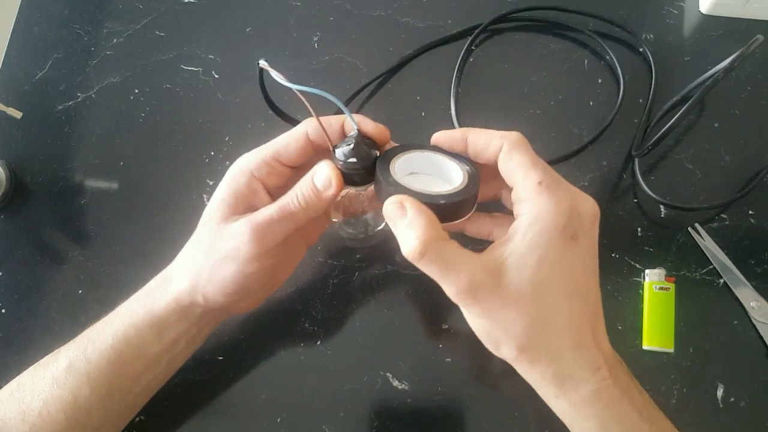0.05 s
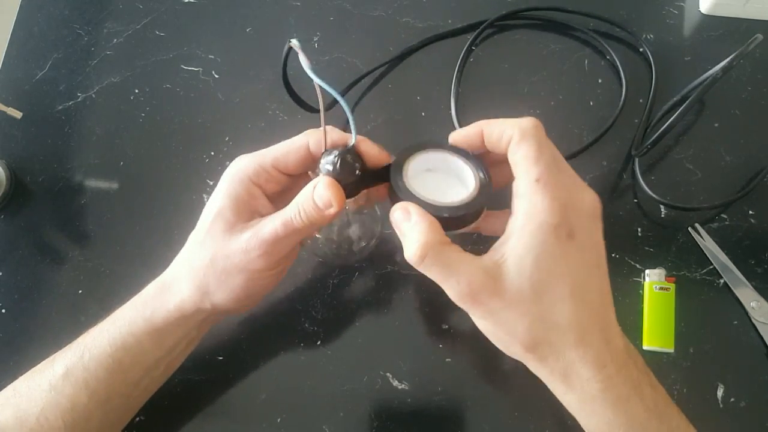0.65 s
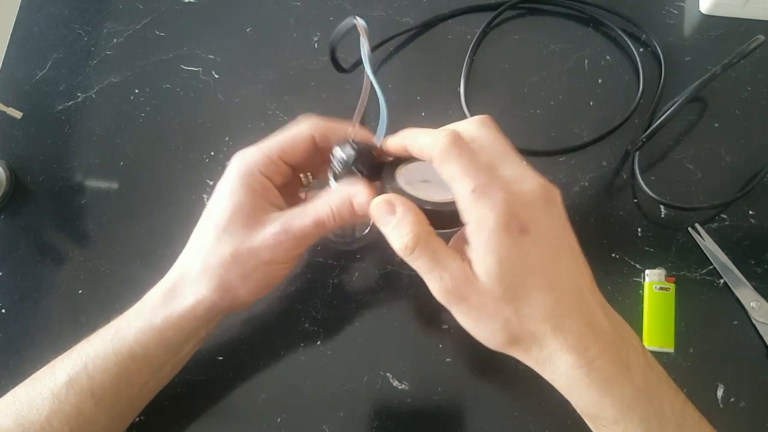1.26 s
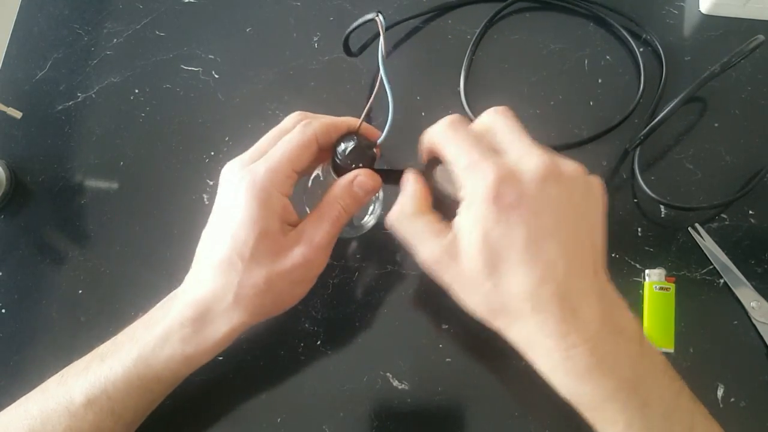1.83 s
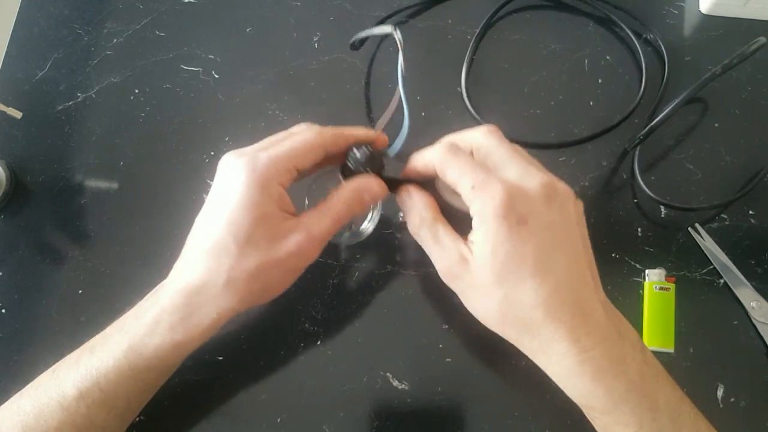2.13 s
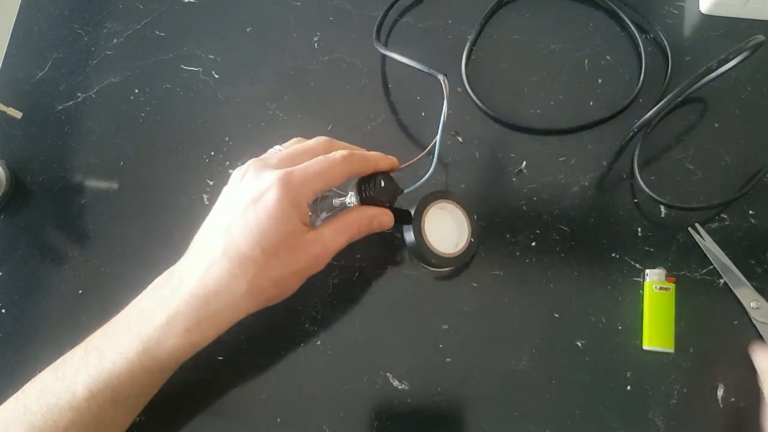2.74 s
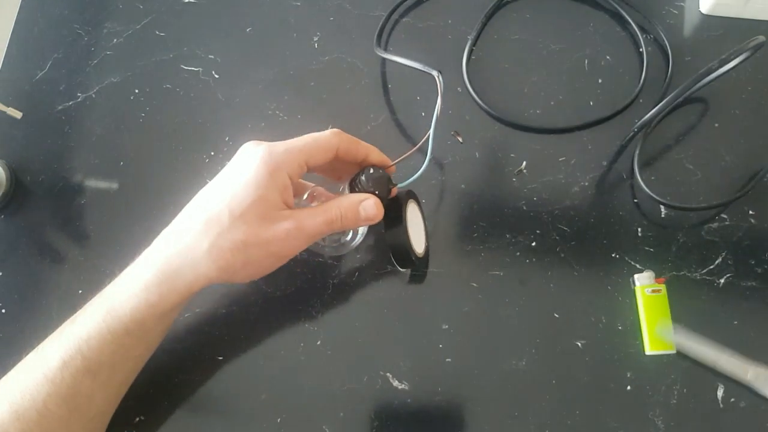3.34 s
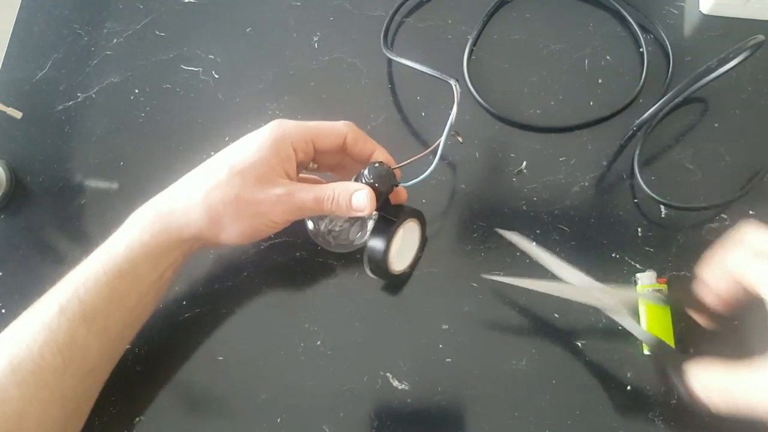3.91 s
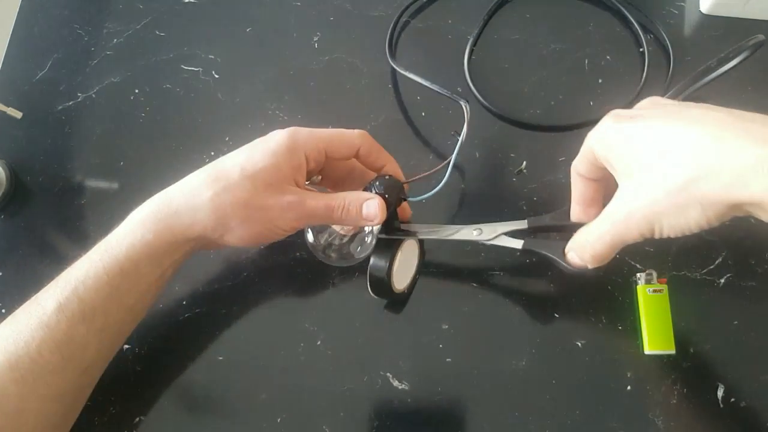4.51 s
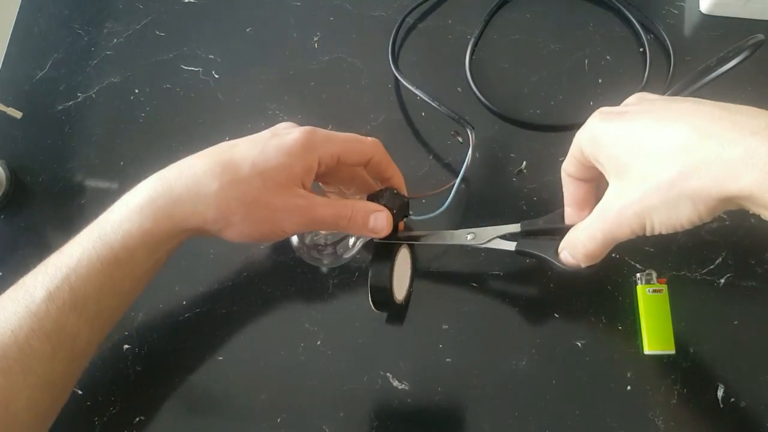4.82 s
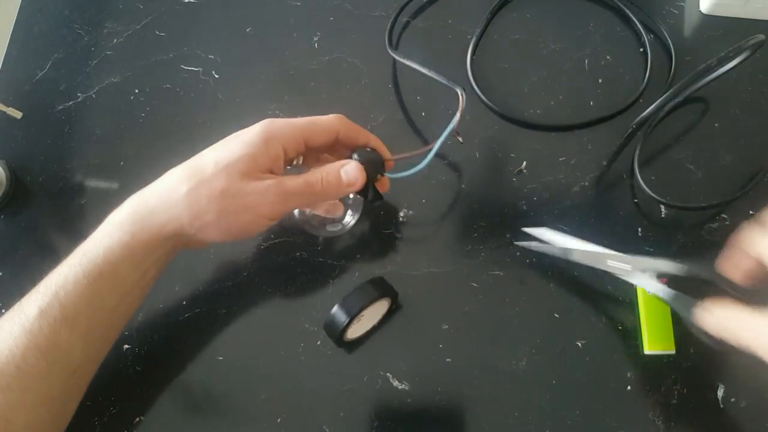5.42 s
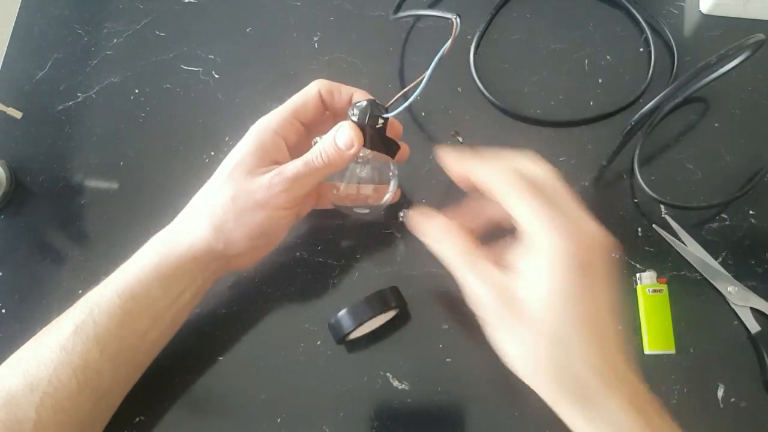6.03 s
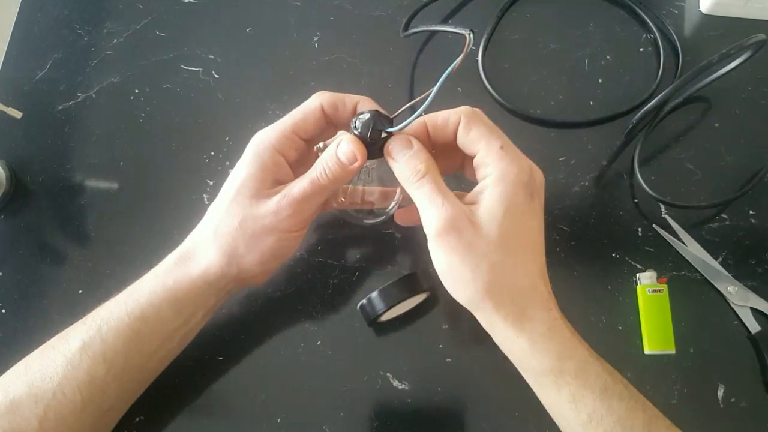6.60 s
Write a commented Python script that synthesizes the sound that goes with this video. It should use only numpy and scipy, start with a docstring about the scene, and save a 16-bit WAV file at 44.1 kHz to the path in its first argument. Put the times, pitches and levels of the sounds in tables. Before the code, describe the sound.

Close by in a bare, ringing room, tape unsticks with quiet snaps and a short crackle before its roll is set down with a dull knock. Steel scissors tap, drag and groan softly over a tabletop, then click shut in a snip. The roll falls with a second knock, the tape snaps again, and the scissors clatter down, the loudest sound. A faint mains hum lies underneath.

```python
"""Taping a lamp holder

Insulating tape is wound round a lamp holder over a table in a bare, ringing room. The glue
lets go in snaps and the roll knocks on the table. Scissors are picked up and snip the tape,
the roll drops, and the scissors clatter down. A mains hum lies under it all.
Each hit is a click with a fading ring; each rub is a swell of filtered noise."""
import sys
import numpy as np
from scipy import signal
from scipy.fft import rfft, irfft
from scipy.io import wavfile

SR = 44100
rng = np.random.default_rng(int(sys.argv[2]) if len(sys.argv) > 2 else 0)


def file_out(sig):
    """Save sig as 16-bit WAV at sys.argv[1]."""
    # one column per channel
    cols = np.atleast_2d(sig).T
    # limit, then scale
    lim = np.clip(cols, -1, 1)
    pcm = np.round(lim * 32767).astype(np.int16)
    wavfile.write(sys.argv[1], SR, pcm)


N = 293706
TIME = np.arange(N) / SR
HIT_SAMPLES = 24576

# glue letting go; more tilt sounds brighter: t/s, level/dB, tilt/dB per octave
SNAP_HITS = [(.4235, -43, 0.5), (.4705, -52, 1.5), (.7623, -55.5, 0), (1.0207, -64, 3), (1.347, -60.5, 5),
             (1.3684, -47.5, 3), (1.377, -47, -1), (1.3915, -40, 2.5), (4.7537, -49.5, -.5),
             (4.9975, -55.5, 0), (5.002, -55, 0), (5.1785, -42.5, 6), (5.1905, -44.5, 7.5),
             (5.2225, -52, 4), (6.376, -56, 3)]
# stretches of peeling: t/s, length/s, crackle level/dB
PEEL_SPANS = [(0.403, .013, -55), (1.357, .05, -57)]
# the tape's tone colour: f/Hz, level/dB
TAPE_COLOUR = [(100, -2.5), (400, 2), (850, -3.5), (1200, 0), (2300, -3.5), (3200, -2), (3900, -2.5),
               (5300, -4.5), (7800, 0.5), (10000, -10.5), (13000, -5), (16000, -15.5)]
# its ringing notes; decay is the time to fade by 60 dB: f/Hz, level/dB, decay/s
TAPE_NOTES = [(1210, 5, 0.044), (3720, -8, 0.06), (4150, 2, 0.035), (7300, -27, 0.045), (8250, 6, 0.035)]

def tape():
    """Glue lets go in single snaps, or in a fine crackle of tiny ones at uneven moments."""
    snaps = hits(SNAP_HITS, TAPE_COLOUR, TAPE_NOTES, room_db=-1.5, ring_db=-10.5,
                 chatter_s=.0017, chatter_db=1.5, left_db=1, lead_s=.00004)
    tiny_snaps = []
    for start, length, db in PEEL_SPANS:
        count = max(int(length * 170), 1)  # about 170 a second
        for k, (late, force) in enumerate(rng.standard_normal((count, 2))):
            tiny_snaps.append((start + length * (k + .5 + .19 * late) / count, db + 3 * force, 0))
    return snaps + hits(tiny_snaps, TAPE_COLOUR, TAPE_NOTES, room_db=-11, ring_db=-14,
                        chatter_s=.0043, chatter_db=5, left_db=2)


# plastic ticks: t/s, level/dB, tilt/dB per octave
PLASTIC_HITS = [(.0898, -53.5, -3), (.5408, -51, 1), (5.0415, -54, 6.5)]
# the plastic's tone colour: f/Hz, level/dB
PLASTIC_COLOUR = [(100, -39.5), (700, -6.5), (1400, -2), (1800, -1.5), (2500, 6), (3200, -3.5), (4500, -11),
                  (6100, 0), (7500, -15), (16000, -37)]
# its ringing notes: f/Hz, level/dB, decay/s
PLASTIC_NOTES = [(1093, 12, 0.051), (1400, 12, 0.082), (1980, -17, 0.07), (2690, 8.5, 0.04),
                 (6060, -1, 0.016)]

def plastic_ticks():
    """The hard plastic of the lamp holder and the roll's rim ticks when bumped."""
    return hits(PLASTIC_HITS, PLASTIC_COLOUR, PLASTIC_NOTES, room_db=4, ring_db=-1.5,
                chatter_s=.0052, chatter_db=24, left_db=2)


# the roll landing: t/s, level/dB, tilt/dB per octave, pitch ratio
ROLL_LANDINGS = [(2.389, -26.5, 2, 1.12), (5.0413, -29.5, -1, 0.96)]
# the roll rocking: t/s, level/dB
ROLL_ROCKS = [(5.186, -42), (5.267, -57.5), (5.398, -57.5), (5.590, -56)]
# its tone colour at pitch ratio 1: f/Hz, level/dB
ROLL_COLOUR = [(50, -20), (90, -7.5), (135, -10.5), (200, -6), (290, 4), (420, 2.5), (560, -4.5),
               (760, -11), (1000, -14), (1700, -16), (2500, -27), (4500, -40), (7000, -39.5),
               (10000, -59.5), (16000, -65)]
# its ringing notes at pitch ratio 1: f/Hz, level/dB, decay/s
ROLL_NOTES = [(231.8, -0.5, .7), (284.5, -2.5, 0.4), (324.6, -4, 0.29)]

def roll_knocks():
    """The roll lands on one edge, flops onto the other and rocks to rest; softer knocks are duller."""
    def knock(events, pitch):
        colour = [(hz * pitch, db) for hz, db in ROLL_COLOUR]
        notes = [(hz * pitch, db, decay) for hz, db, decay in ROLL_NOTES]
        return hits(events, colour, notes, room_db=3.5, ring_db=-8,
                    chatter_s=.012, chatter_db=7, left_db=1.5, table_db=-11)
    flop_s, flop_db, firm_db = .022, -7, -32.5
    dulling = .57  # tilt lost for each dB softer
    out = knock([(start, db, dulling * (db - firm_db)) for start, db in ROLL_ROCKS], pitch=.99)
    for start, db, tilt, pitch in ROLL_LANDINGS:
        flop = (start + flop_s, db + flop_db, tilt + dulling * flop_db)
        out += knock([(start, db, tilt), flop], pitch)
    return out


# scissors hitting the table: t/s, level/dB, tilt/dB per octave
SCISSOR_HITS = [(2.9917, -38, -2.5), (3.040, -48.5, 0.5), (3.3838, -42.5, -1), (3.4267, -32.5, 3),
                (5.7849, -27.5, 2), (5.8188, -13, 1), (5.8295, -27.5, -3.5), (5.857, -24.5, -3)]
# their tone colour: f/Hz, level/dB
SCISSOR_COLOUR = [(50, -26.5), (105, -6), (170, -7), (260, -5), (400, 4.5), (700, -5.5), (1080, 0),
                  (1500, -9), (2100, 1.5), (3200, 2.5), (4500, -13), (5900, 3.5), (7100, -5), (8600, -4),
                  (10200, -17.5), (13000, -10), (16000, -18.5)]
# tips touching down while the handles are held: t/s, level/dB, tilt/dB per octave
TIP_HITS = [(3.4462, -37.5, 1), (3.830, -61.5, 4), (5.6656, -34, -0.5), (5.6956, -35.5, -3),
            (5.716, -51, 5.5)]
# their tone colour: f/Hz, level/dB
TIP_COLOUR = [(50, -22), (105, -3), (200, 1), (310, -7.5), (410, 12), (650, -1), (850, -15.5),
              (1300, -12.5), (2300, -1.5), (4100, -7.5), (5900, 5.5), (7000, -9.5), (8500, 7), (10200, -12),
              (12500, -0.5), (16000, -10)]
# the steel's ringing notes: f/Hz, level/dB, decay/s
STEEL_NOTES = [(1740, -2.5, 0.56), (2220, 5.5, 0.26), (2225, -8, 1), (2376, 5.5, 1), (2460, -5.5, 0.15),
               (2480, -3.5, 0.48), (2960, -6.5, .55), (2990, 0.5, 0.61), (3290, -1.5, 0.27),
               (3260, -11, .5), (3680, -0.5, 0.41), (4660, 3.5, .35), (5500, -9, 0.13), (5770, 6, 0.15),
               (7640, -4, .35), (9400, -6.5, 0.4), (12300, -3, .2)]

def scissor_clatter():
    """The scissors meet the table, and both the steel and the table top ring."""
    clatter = hits(SCISSOR_HITS, SCISSOR_COLOUR, STEEL_NOTES, room_db=6, ring_db=-6,
                   chatter_s=.0027, chatter_db=4.5, left_db=2, lead_s=.0004, table_db=-9.5)
    tips = hits(TIP_HITS, TIP_COLOUR, STEEL_NOTES, room_db=3, ring_db=-10.5,
                chatter_s=.0026, chatter_db=18.5, left_db=.5, table_db=-5.5)
    return clatter + tips


# blade clicks: t/s, level/dB, tilt/dB per octave
BLADE_HITS = [(4.4514, -34.5, -2.5), (4.5332, -49, 18), (4.6644, -48.5, 7)]
# the blades' tone colour: f/Hz, level/dB
BLADE_COLOUR = [(200, -30), (700, -24.5), (1500, -10), (1900, -11.5), (2250, -4), (3000, -17.5),
                (3700, -19), (5000, -6), (5600, -12), (6450, 8.5), (7200, -11), (8000, -8), (10000, -29),
                (16000, -39)]
# their ringing notes: f/Hz, level/dB, decay/s
BLADE_NOTES = [(2300, 23, 0.011), (4850, 2, 0.06), (6600, -15, 0.015), (7400, 4, .02)]

def scissor_snips():
    """The blades click against each other and ring very briefly."""
    return hits(BLADE_HITS, BLADE_COLOUR, BLADE_NOTES, room_db=-1.5, ring_db=-2,
                chatter_s=.00095, chatter_db=10, left_db=2, lead_s=.00014)


# a hand leaning on the table: t/s, length/s, relative level/dB
LEAN_SPANS = [(2.855, 0.035, -51.5), (3.19, 0.019, -58.5), (3.415, 0.077, -47), (3.66, 0.026, -58)]
# its deep rumble: f/Hz, level/dB
RUMBLE_COLOUR = [(25, -39), (45, -7), (70, -1), (110, 2), (150, -6), (300, -19), (1000, -58)]
# scissors being pushed: t/s, length/s, relative level/dB
PUSH_SPANS = [(2.855, 0.079, -58), (2.99, 0.108, -43.5), (3.17, 0.086, -52), (3.422, 0.033, -36),
              (3.695, 0.032, -47), (3.885, 0.016, -54)]
# their scrape: f/Hz, level/dB
SCRAPE_COLOUR = [(200, 6), (450, 16.5), (1000, 10), (1600, 13), (2500, 7.5), (4000, -4.5), (5000, -2),
                 (6000, -10), (7200, -1.5), (8800, -4.5), (10500, -9.5), (14000, -5), (16000, -16)]
# blades gliding on their tips: t/s, length/s, relative level/dB
GLIDE_SPANS = [(2.855, 0.113, -58), (3.885, 0.017, -53.5)]
# their thin, bright hiss: f/Hz, level/dB
GLIDE_COLOUR = [(2000, -22), (4500, -9), (6000, 1), (7500, -7), (8200, -5), (8900, 6), (9700, -10),
                (10800, -18), (12200, -4), (13800, -10), (14800, 1), (16000, 0)]

def scissor_drag():
    """The table rumbles under a hand while the scissors stick, slip and glide over it."""
    rumble = room_boom(noise(RUMBLE_COLOUR) * swells(LEAN_SPANS, rise_s=.014, fall_s=.036), db=-22.5)
    scrape = noise(SCRAPE_COLOUR) * swells(PUSH_SPANS, rise_s=.01, fall_s=.023)
    scrape *= flicker(rate_hz=170, depth_db=5)
    glide = noise(GLIDE_COLOUR) * swells(GLIDE_SPANS, rise_s=.0072, fall_s=.01)
    return pan(rumble + scrape + glide, left_db=3)


# fingers changing their hold: t/s, length/s, relative level/dB
FINGER_SPANS = [(.88, 0.011, -52.5), (.958, 0.036, -58.5), (1.1, 0.09, -65.5)]
# their dull rustle: f/Hz, level/dB
RUSTLE_COLOUR = [(100, -18), (300, 5), (700, -1.5), (1300, -4), (2500, -10.5), (5000, -23), (16000, -32)]

def finger_rustle():
    """Skin sticks and slips on the side of the roll."""
    pressure = swells(FINGER_SPANS, rise_s=.0063, fall_s=.025)
    return noise(RUSTLE_COLOUR) * pressure * flicker(rate_hz=200, depth_db=3.5)


# runs of short rubs: start t/s, end t/s, first period/s, f/Hz, relative level/dB
GROAN_RUNS = [(2.866, 2.9, 0.11, 476, -57), (2.918, 3.0, 0.21, 638, -54.5),
              (3.708, 4.23, .056, 410.4, -52.5), (4.222, 4.42, 0.089, 778, -61)]

def table_groans():
    """Each rub on the table sounds one rough note over a weak scratch; a run slows and fades."""
    out = np.zeros((2, N))
    width_ratio, scratch_db, fade_db_per_s, slowing = 1.14, -29.5, 11.5, 1.143
    for start, end, period, pitch_hz, db in GROAN_RUNS:
        now = start
        while now < end:
            bend_octaves, force_db = rng.normal(0, [.057, 1.8])
            hz = pitch_hz * 2 ** bend_octaves
            colour = [(hz / 4, scratch_db), (hz / width_ratio, -18), (hz, 0),
                      (hz * width_ratio, -18), (2500, scratch_db), (9000, -50)]
            size = int(.61 * period * SR)  # the rest of the period is silent
            rub = tint(stereo_noise(HIT_SAMPLES), colour)[:, :size] * signal.windows.tukey(size, .6)
            level = gain(db + force_db - fade_db_per_s * (now - start))
            add(out, now, level * unit_energy(rub) * np.sqrt(size))
            now += period
            period *= slowing
    return out


def finger_stroke():
    """Skin slides on tape with a hiss; the hollow under the finger sinks in pitch."""
    peak_s, spread_s = 1.897, .045
    centre_hz, width_octaves, octaves_per_s = 2020, .69, 14
    hz, t, spectrum = signal.stft(stereo_noise(N), SR, nperseg=256)
    sunk = np.clip(octaves_per_s * (t - peak_s), -.5, .5)
    octaves_away = np.log2((hz[:, None] + 1) / centre_hz) + sunk
    _, band = signal.istft(spectrum * np.exp(-(octaves_away / width_octaves) ** 2), SR)
    hollow = unit_energy(band[:, :N]) * np.sqrt(N)
    hiss = noise([(1000, -7), (4500, -4), (6500, 3), (10000, -6), (13000, -2), (16000, -9.5)])
    pressure = gain(-60.5) * np.exp(-((TIME - peak_s) / spread_s) ** 2)
    return (hollow + gain(1.5) * hiss) * flicker(rate_hz=500, depth_db=3) * pressure


# the table top's ringing notes: f/Hz, level/dB, decay/s
TABLE_NOTES = [(105.8, 6.5, 0.17), (389, 2.5, 0.59), (409, 7.5, 0.29), (438.4, -1.5, 0.75), (472, -1, 0.49),
               (661.4, 17.5, 0.19), (982, 6.5, 0.84)]

def hits(events, colour, notes, room_db, ring_db, chatter_s, chatter_db, left_db,
         lead_s=0, table_db=-np.inf):
    """Each hit is a click, a brief noisy chatter and a ring. Returns (direct, sent to the room)."""
    direct, to_room = np.zeros((2, 2, N))
    t = np.arange(HIT_SAMPLES) / SR
    pulse = np.sinc((t - np.array([[0], [lead_s]])) * SR)  # reaches the left lead_s earlier
    rings = [ring(notes), ring(TABLE_NOTES)]
    for start, db, tilt in events:
        burst = stereo_noise(HIT_SAMPLES) * np.exp(-t / chatter_s)
        parts = tint(np.array([pulse, burst, *rings]), colour, tilt)
        click, chatter, tone, table = map(unit_energy, parts)
        contact = unit_energy(click + gain(chatter_db) * chatter)
        hit = contact + gain(ring_db) * tone + gain(table_db) * table
        level = gain(db) * np.sqrt(SR / 100)  # as if spread over 10 ms
        add(direct, start, level * pan(hit, left_db))
        add(to_room, start, level * gain(room_db) * click)
    return np.array([direct, to_room])


# how long the echo lasts: f/Hz, decay/s
ECHO_DECAY = [(100, 0.87), (260, 0.86), (700, 0.89), (1900, 0.92), (3000, 0.88), (5000, 0.74), (8000, 0.52),
              (13000, 0.37)]
# its tone colour: f/Hz, level/dB
ECHO_COLOUR = [(60, -12), (110, -5), (137, -5.5), (170, 1.5), (400, -6), (900, 3), (2500, -3), (4000, -2),
               (6200, -9.5), (9000, -7), (16000, -9.5)]

def room_echo(sound):
    """Bare walls return a few quick echoes, then a dense tail whose treble dies first."""
    size = 65536
    t = np.arange(size) / SR
    spectrum, tail = rfft(stereo_noise(size)), np.zeros((2, size))
    for band_hz, decay in ECHO_DECAY:
        band = curve([(hz, hz == band_hz) for hz, _ in ECHO_DECAY], size)
        fade_rate = np.log(1000) / decay
        tail += irfft(spectrum * band) * np.exp(-fade_rate * t) * np.sqrt(2 * fade_rate / SR)
    tail *= 1 - np.exp(-(t / .0067) ** 2)  # the tail takes a moment to build
    for delay_s, db in [(.008, -19.5), (.0115, -41), (.0195, -31)]:
        for channel in tail:
            channel[int((delay_s + rng.uniform(0, .0005)) * SR)] += gain(db)
    echo = signal.fftconvolve(sound[:1], tint(tail, ECHO_COLOUR), axes=1)
    return pan(echo[:, :N], left_db=1.26)


# the room's own deep note: f/Hz, level/dB, decay/s
ROOM_NOTE = [(122, 0, 0.69)]

def room_boom(sound, db):
    """Deep sounds set a standing wave going between the walls, which adds to them."""
    return sound + gain(db) * signal.fftconvolve(sound, ring(ROOM_NOTE), axes=1)[:, :N]


# still room air: f/Hz, level/dB
AIR_COLOUR = [(15, -62.5), (25, -12.5), (48, -19.5), (123, -5.5), (145, -9.5), (175, -9.5), (223, -12.5),
              (293, -12.5), (503, -15), (1020, -21.5), (1330, -19), (1520, -24), (2480, -25), (4370, -30),
              (16000, -35)]

def air_and_hum():
    """A faint rush of room air, and a mains hum that wavers a little."""
    hum_hz = 119
    hum = gain(-71.5) * np.sqrt(2) * np.sin(2 * np.pi * hum_hz * TIME)
    hum *= flicker(rate_hz=2.9, depth_db=3)
    return pan(gain(-67.5) * noise(AIR_COLOUR) + hum, left_db=1.5)


# stereo width: f/Hz, level/dB of the side against the middle
STEREO_WIDTH = [(50, -16), (125, -6), (250, -10.5), (500, -7), (1000, 0.5), (2000, -0.5), (16000, 0.5)]

def stereo_noise(size):
    """Noise from all around: left and right are alike in the bass, unrelated in the treble."""
    mid, side = rfft(rng.standard_normal((2, size)))
    width = gain(curve(STEREO_WIDTH, size))
    return irfft(np.array([mid + width * side, mid - width * side]) / np.sqrt(1 + width ** 2), size)


def noise(colour):
    """Steady noise with a tone colour and an average power of one."""
    return unit_energy(tint(stereo_noise(N), colour)) * np.sqrt(N)


def ring(notes):
    """Fading sine waves; the high ones reach left and right out of step."""
    t = np.arange(HIT_SAMPLES) / SR
    lags = rng.uniform(-2e-4, 2e-4, (len(notes), 2, 1))
    return unit_energy(sum(gain(db - 60 * t / decay) * np.sin(2 * np.pi * hz * (t + lag))
                           for (hz, db, decay), lag in zip(notes, lags)))


def swells(spans, rise_s, fall_s):
    """A volume curve: each move rises, holds until its length is up and dies away."""
    return sum(gain(db) * np.clip((TIME - start) / rise_s, 0, 1)
               * np.exp(-np.maximum(TIME - start - length, 0) / fall_s) for start, length, db in spans)


def flicker(rate_hz, depth_db):
    """A volume that wanders at random, with an average power of one."""
    steps = np.arange(0, N / SR + 1, 1 / rate_hz)
    wander = np.interp(TIME, steps, rng.standard_normal(len(steps)))
    return unit_energy(gain(depth_db * wander)) * np.sqrt(N)


def tint(sound, colour, tilt=0):
    """Filter a sound to a tone colour, tilted about 1 kHz by so many dB per octave."""
    length = sound.shape[-1]
    size = length + length % 2
    octaves = np.log2(np.maximum(np.fft.rfftfreq(size, 1 / SR), 150) / 1000)
    cepstrum = irfft(np.log(gain(curve(colour, size) + tilt * octaves)))
    # fold it forward in time, so nothing rings before it is struck
    cepstrum[1:size // 2] *= 2
    cepstrum[size // 2 + 1:] = 0
    return irfft(rfft(sound, size) * np.exp(rfft(cepstrum)))[..., :length]


def curve(points, size):
    """Join (frequency, value) points into a curve across the spectrum."""
    hz, value = np.transpose(points)
    return np.interp(np.log(np.fft.rfftfreq(size, 1 / SR) + 1), np.log(hz), value)


def gain(db):
    """Turn decibels into a multiplier."""
    return 10 ** (np.asarray(db) / 20)


def unit_energy(sound):
    """Scale to an average energy of one per channel."""
    return sound / np.sqrt(np.mean(np.sum(sound ** 2, axis=-1)))


def pan(sound, left_db):
    """Lean a sound to the left."""
    return sound * gain(np.array([[left_db], [-left_db]]) / 2)


def add(track, start_s, sound):
    """Mix a sound in at a given time."""
    start = int(start_s * SR)
    track[:, start:start + sound.shape[-1]] += sound[:, :N - start]


def scene():
    """The hits and rubs, their echo in the room, and the background."""
    direct, to_room = tape() + plastic_ticks() + roll_knocks() + scissor_clatter() + scissor_snips()
    rubbing = scissor_drag() + finger_rustle() + table_groans() + finger_stroke()
    echo = room_boom(room_echo(to_room + gain(-1.5) * rubbing), db=-35.5)
    return direct + gain(-3) * rubbing + echo + air_and_hum()


def record(dry):
    """Round off the loudest peaks and cut the highest treble."""
    ceiling, top_hz = .75, 16000
    rounded = ceiling * np.tanh(dry / ceiling)
    return signal.sosfilt(signal.ellip(10, .2, 80, top_hz, fs=SR, output="sos"), rounded)


dry = scene()
out = record(dry)
file_out(out)
```